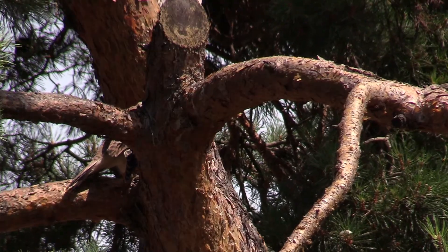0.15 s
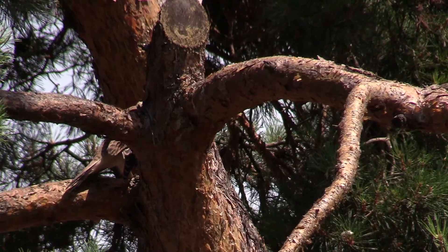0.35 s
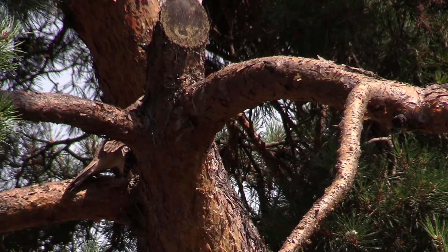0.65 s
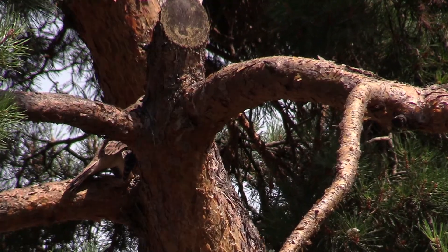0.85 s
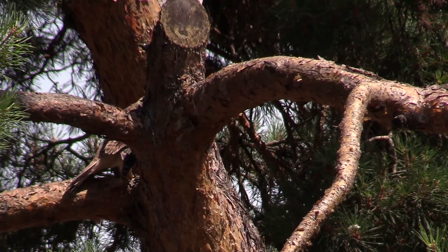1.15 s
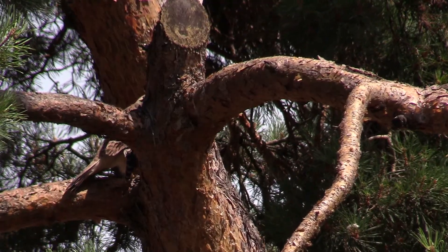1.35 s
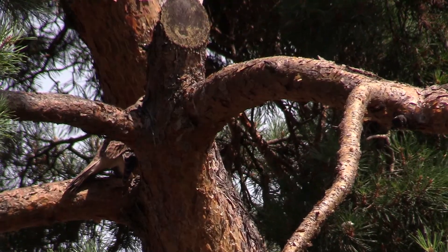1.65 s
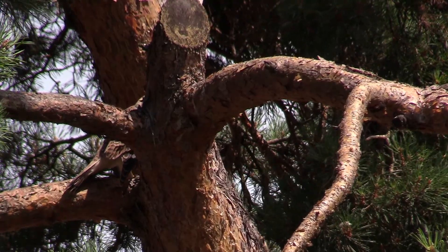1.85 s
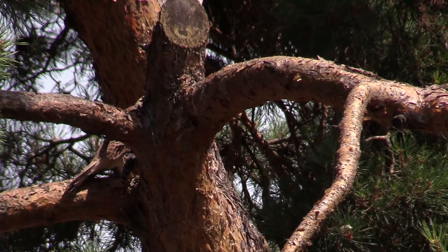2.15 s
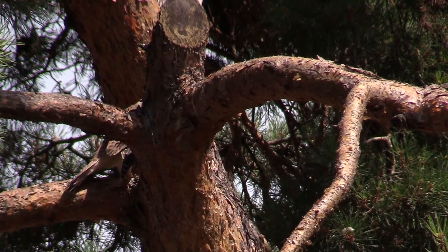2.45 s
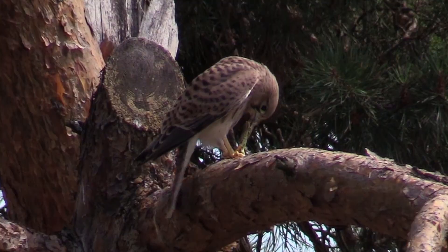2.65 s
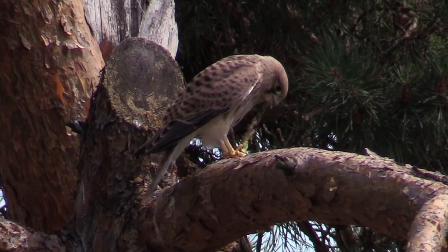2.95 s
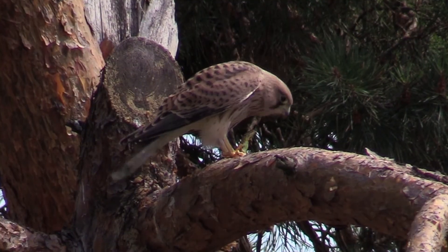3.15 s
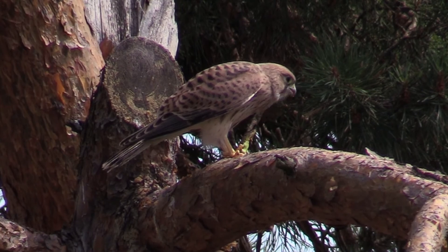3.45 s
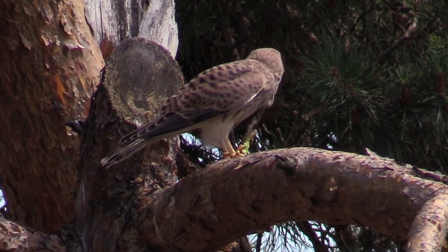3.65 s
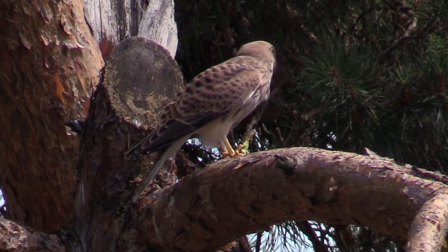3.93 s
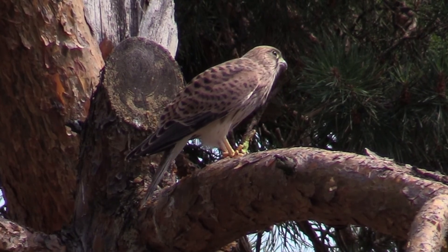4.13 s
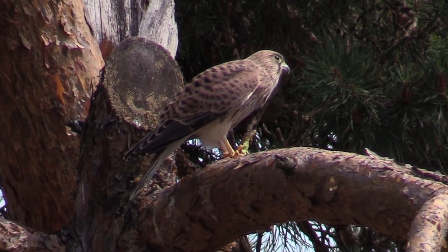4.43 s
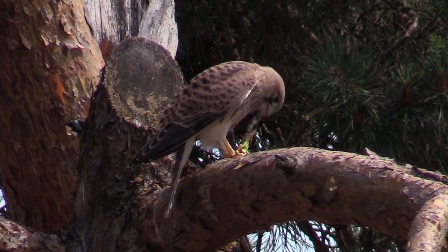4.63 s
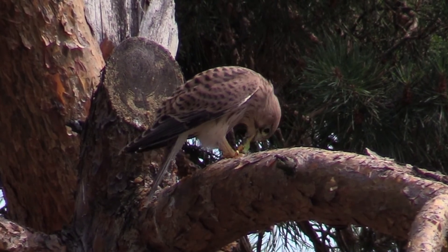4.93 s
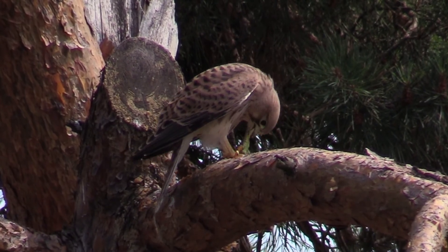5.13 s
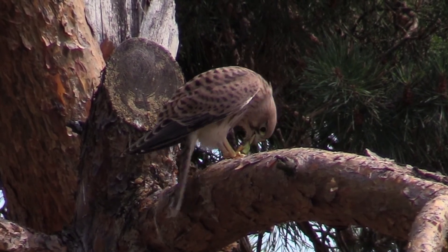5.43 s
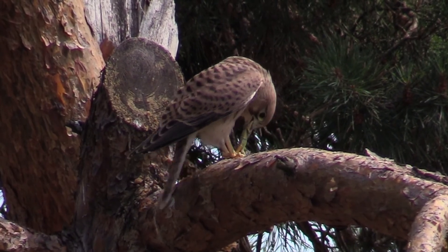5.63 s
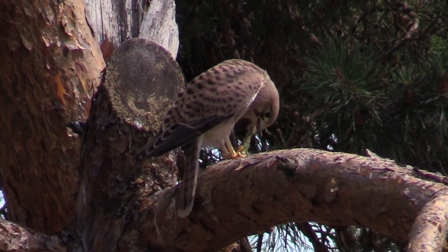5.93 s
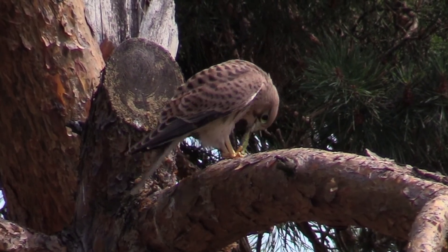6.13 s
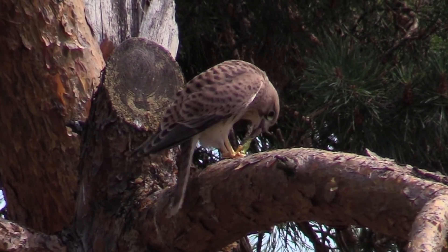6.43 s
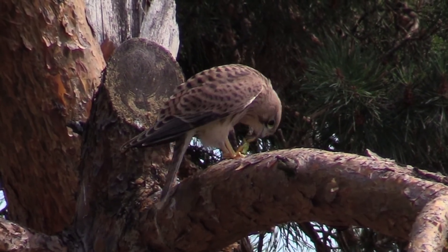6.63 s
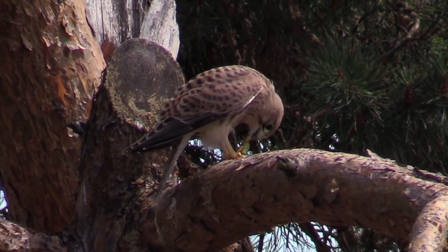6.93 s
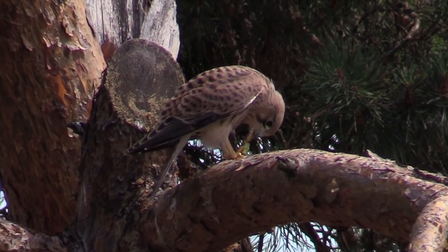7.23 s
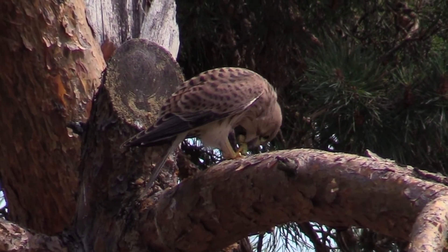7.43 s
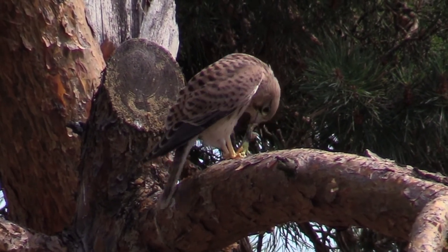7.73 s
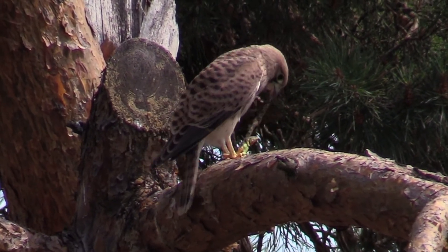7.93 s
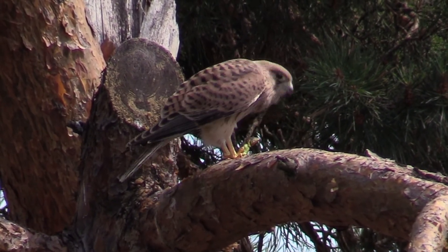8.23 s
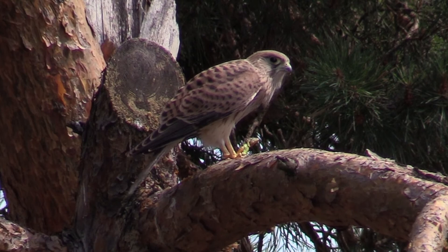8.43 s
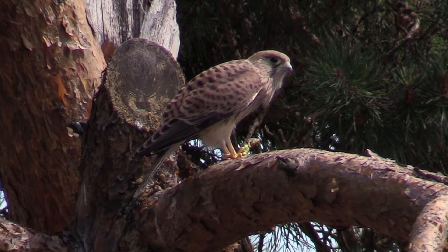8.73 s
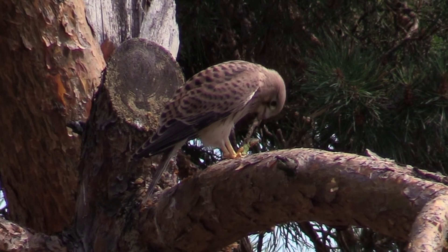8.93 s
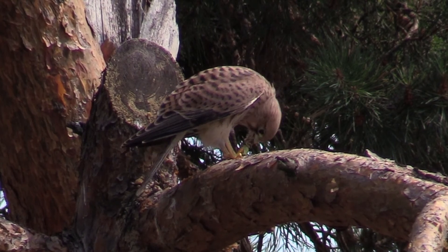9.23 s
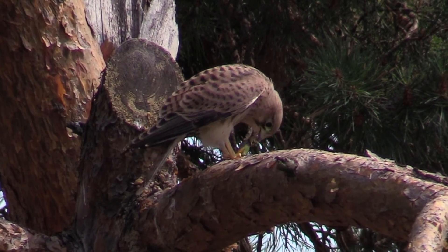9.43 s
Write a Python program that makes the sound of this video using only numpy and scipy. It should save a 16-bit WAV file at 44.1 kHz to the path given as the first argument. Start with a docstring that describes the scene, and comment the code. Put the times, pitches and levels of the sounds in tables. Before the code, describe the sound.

A calm pine wood in wide, natural stereo, with a soft wash of air, barely stirring needles and a deep faint rumble. A harsh double call is already under way at 0 seconds and repeats near 2, 4.2, 6.5 and 8.6, short and raspy, with a scattered woodland echo. A sharp twig tick comes at 0.1. From 0.4 to 2.3 a close wren-like bird sings thin, fast, sliding whistles with a brief burst of dry chips, the high notes leaning left. From 2.6 to 6.4 it is silent, leaving faint distant buzzes, pips and repeated chirps around 4 to 4.6, while small bark ticks cluster around 4.5 to 5.3 under the feeding falcon. The song returns from 6.6 to 9, with slurred far whistles around 7.4 to 8.2, then thins into soft chips and a few last notes by 9.6. A distant low engine swells almost inaudibly at times.

```python
"""A pine wood on a still day, heard by two spaced microphones. A wren-like songbird whistles and chips close by,
its high notes to the left; a larger bird gives a harsh double call about every two seconds, breath and voice.
Small birds whistle and buzz further off; bark and twigs tick, as short noise, under a feeding falcon.
Trunks scatter the birds and ticks, over stirring needles, a soft wash of air and a far engine note."""
import sys
import numpy as np
from scipy import signal
from scipy.fft import rfft, irfft, next_fast_len
from scipy.io import wavfile
from scipy.ndimage import uniform_filter1d

SR = 44100
rng = np.random.default_rng(int(sys.argv[2]) if len(sys.argv) > 2 else 0)


def transcribe(u):
    """Save the signal u as a 16-bit wav file named by the first command-line argument.

    u: samples, shape (n,) or (channels, n), limited to [-1, 1]; the rate is SR.
    q: integer samples, one column per channel.
    """
    v = np.clip(np.atleast_2d(u).T, -1, 1)
    q = np.round(v * 32767).astype(np.int16)
    wavfile.write(sys.argv[1], SR, q)


N = 422478   # length in samples

# near song, note by note: start_s, syllable, length_s, level_db, pitch_shift_percent
SONG_NOTES = [(.436, "sag", 0.13, -35.5, 0.011), (.635, "drop", 0.041, -41.5, .1),
              (0.74, "lift", 0.079, -18.5, .1), (.85, "drop", 0.042, -34.5, 0.36),
              (.94, "flat", 0.05, -28, 0.25), (1.003, "hook", .041, -33.5, 0.21),
              (1.103, "flat", 0.045, -28, 0.37), (1.161, "hook", .041, -32.5, 0.15),
              (1.259, "slide", 0.13, -23.5, -0.02), (1.524, "arch", 0.065, -22, -0.05),
              (1.76, "rise", 0.087, -20.5, -0.13), (1.891, "dive", .051, -20.5, -1.2),
              (1.972, "scoop", 0.089, -22.5, -0.056), (2.108, "dive", 0.049, -20.5, -0.91),
              (2.188, "scoop", 0.093, -25, -0.49), (6.616, "sag", .115, -34, -1.57),
              (6.808, "drop", 0.037, -39, 0.33), (6.911, "lift", 0.086, -19, 0.29),
              (7.018, "drop", 0.039, -32.5, 0.48), (7.113, "flat", 0.055, -29, 0.52),
              (7.172, "hook", 0.045, -32.5, 0.24), (7.286, "slide", 0.12, -22.5, -0.032),
              (7.536, "arch", 0.063, -21.5, 0.39), (7.764, "rise", 0.085, -19, 0.79),
              (7.892, "dive", .049, -20, .1), (7.976, "scoop", 0.083, -20.5, 1.2),
              (8.113, "dive", 0.041, -20, 1), (8.191, "scoop", .089, -23.5, 0.025),
              (8.323, "dive", 0.055, -22.5, -0.12), (8.406, "scoop", .088, -23.5, -0.13),
              (8.544, "dive", 0.052, -23, 1), (8.818, "hold", .16, -27.5, 0.18),
              (9.295, "peak", 0.063, -30.5, -0.032), (9.422, "flick", .07, -32.5, 0.02),
              (9.536, "whip", .036, -35.5, 0.27)]
# its syllable shapes by name: place in the note (0-1), pitch_hz, level_db against the note
SYLLABLE_SHAPES = { "sag": [(0, 7500, -7), (.2, 6660, -5.5), (.5, 6320, -4.5), (.8, 6130, 1.5),
                   (1, 6100, -19)], "drop": [(0, 5050, -8), (.25, 4960, -3), (.7, 4020, -3.5),
                   (.92, 3610, -15), (1, 3620, -25)], "lift": [(0, 5600, -24), (.25, 5900, -9.5),
                   (.5, 6013, 0), (.8, 6520, -16), (1, 6540, -28)], "flat": [(0, 5180, -20),
                   (.25, 5080, -11), (.55, 5140, -2), (.75, 5120, -6), (1, 5300, -16)],
                   "hook": [(0, 5300, -19), (.2, 5400, -6.5), (.45, 4950, 1.5), (.72, 4270, -2.5),
                   (.93, 3956, -14), (1, 3800, -26.5)], "slide": [(0, 9050, -26), (.06, 8900, -18.5),
                   (.22, 8200, -2.5), (.45, 7600, -3.5), (.88, 7010, 1.5), (1, 7100, -16)],
                   "arch": [(0, 5840, -12), (.19, 6880, -7), (.29, 6990, 0), (.8, 5520, -2),
                   (1, 5080, -28)], "rise": [(0, 6700, -22), (.08, 6610, -2), (.42, 6730, 0.5),
                   (.87, 7590, -12), (.97, 8050, -13), (1, 7950, -29)], "scoop": [(0, 6000, -1),
                   (.15, 6410, -5), (.58, 6720, 0), (.87, 7650, -10.5), (.97, 8030, -13), (1, 8140, -28)],
                   "dive": [(0, 6250, -25), (.24, 6300, -1), (.77, 4814, -11), (.94, 4300, -19.5),
                   (1, 4200, -28)], "hold": [(0, 7050, -28), (.12, 6900, 1.5), (.25, 6480, -0.5),
                   (.77, 6420, -1.5), (1, 6430, -20)], "peak": [(0, 8000, -18), (.16, 8240, -4),
                   (.38, 8250, -2), (.72, 7120, 0), (1, 6900, -5)], "whip": [(0, 4200, -15), (.4, 4800, -1),
                   (.7, 5900, -3.5), (1, 6200, -22)], "flick": [(0, 4430, -23), (.3, 4360, -8),
                   (.55, 4700, -1.5), (.82, 5890, -2), (1, 6180, -20)], }
# runs of dry falling chips in soft-loud pairs: first_s, last_s, pair_spacing_s, base_level_db
CHIP_RUNS = [(1.626, 1.723, .066, -42.5), (7.636, 7.73, .064, -43.5), (9, 9.245, .0702, -47)]
# how the song leans with pitch: pitch_hz, left_over_right_db
SONG_LEAN = [(4400, -2.5), (5200, -6.5), (5600, -5), (6200, 11), (6800, 10), (7600, 7), (8600, 11)]
# harsh double calls, the first already under way: start_s, level_db, gap_to_second_bark_s, second_length_s
DOUBLE_CALLS = [(-.06, -41.5, 0.1, 0.047), (2.02, -41, 0.11, 0.045), (4.207, -42, 0.12, 0.063),
                (6.493, -41.5, .11, 0.046), (8.579, -41.5, 0.099, 0.051)]
# throat resonances that colour the breath: centre_hz, width_hz of one filter pass, level_db
THROAT_BANDS = [(1114, 310, -5), (1630, 154, -7), (1906, 260, -8.5), (2636, 330, -10.5), (3752, 256, 3.5),
                (4800, 430, -5), (5350, 650, -6.5), (6330, 660, -15), (7430, 260, -18), (5500, 2300, -13.5),
                (1940, 2200, -19)]
# farther birds: start_s, kind, length_s, middle_hz, level_db, left_over_right_db
FAR_NOTES = [(.209, "high buzz", 0.085, 8620, -40, 3), (.261, "rasp", 0.028, 6330, -51, -1),
             (0.342, "rasp", 0.027, 6550, -46.5, 2), (0.345, "high buzz", 0.0795, 8680, -43, 5),
             (0.39, "up", 0.025, 6250, -50, 3), (0.748, "level", 0.059, 8120, -45.5, -3),
             (1.44, "down", 0.032, 3120, -51, -3), (2.618, "buzz", .13, 7600, -55, 16),
             (2.851, "buzz", 0.16, 7600, -53, 10), (2.997, "pip", 0.022, 2140, -48, 0),
             (2.996, "pip", .025, 2710, -54, -2), (3.146, "pip", 0.022, 1700, -54, 0),
             (3.183, "level", .087, 6280, -60, -6), (3.23, "up", .03, 1830, -55, 2),
             (3.382, "level", 0.067, 6300, -57, 1), (3.465, "slur", .07, 5500, -58, -4),
             (3.575, "level", .048, 3900, -63, -7), (3.491, "droop", .019, 2440, -55, 0),
             (3.682, "buzz", .14, 7200, -49, 6), (3.817, "droop", 0.25, 7200, -57.5, 6),
             (3.998, "chirp", .069, 4570, -51.5, -10), (4.18, "chirp", 0.079, 4520, -52, -9),
             (4.372, "chirp", 0.072, 4620, -55, -7), (4.542, "chirp", 0.077, 4470, -53, -11),
             (4.73, "droop", 0.07, 7900, -58, 6), (4.896, "down", .026, 4680, -53, -6),
             (4.982, "up", .1, 7130, -54, 8), (5.044, "droop", 0.092, 6430, -55, -2),
             (5.452, "buzz", .1, 6570, -56, -3), (5.781, "pip", 0.019, 2075, -48.5, 2),
             (5.793, "down", 0.02, 4450, -56, -4), (6.388, "level", .12, 7230, -59, 7),
             (6.573, "up", 0.025, 6230, -48, 3), (7.373, "slur", .11, 4540, -47, -2),
             (7.462, "down", .033, 3000, -57, -5), (7.557, "up", 0.087, 3650, -49, -4),
             (7.715, "slur", .097, 4500, -48, -5), (7.902, "up", 0.092, 3630, -48.5, -3),
             (8.09, "slur", 0.1, 4500, -47, -6), (8.383, "level", .04, 6810, -45.5, 12),
             (9.287, "droop", 0.011, 7350, -50, 5)]
# far kinds by name: start_percent and end_percent above middle pitch, buzz_depth_hz, swell_db start to end
FAR_SHAPES = {"buzz": (-5, 0, 338, -1), "high buzz": (-4.5, -.5, 120, -4), "rasp": (-6.5, 10, 690, .1),
              "level": (-1.5, .1, 40, -1), "up": (-6, 6, 0, 7), "chirp": (-13, 18, 0, 7),
              "slur": (16, -5, 0, 3), "down": (14.7, -14, 0, -5), "droop": (3, -4.5, 70, -4),
              "pip": (.1, -.5, 0, .1)}
# ticks of bark and twigs: start_s, bright_band_peak_db, left_over_right_db, low_band_db against the bright band
TWIG_TICKS = [(.1101, -46, 2, -4), (.1271, -29.5, -2, -11), (0.7154, -42.5, 4, 10), (1.1096, -45, .5, -4),
              (1.513, -43, 2.5, 5), (2.0622, -47, 5, -4), (3.0597, -36, 5, -10), (3.1592, -45, 9, -5),
              (4.5145, -39, 5, 6), (4.8289, -48, 2, -8), (4.882, -36.5, 6, -17), (4.9985, -44, .5, -8),
              (5.0449, -42, 1.5, -4), (5.1467, -45, 3, -6), (5.2505, -40.5, -1, -5), (5.3253, -41, -1, -8),
              (6.1477, -37.5, 9, -22), (6.6667, -46, 14, -4), (7.8461, -44, 8, -4), (7.9049, -39, 6, -12),
              (7.9428, -45, 11, 2), (8.6605, -42, -2, 0), (8.6971, -40, -3, -2), (8.735, -43, -3.5, -4),
              (9.1112, -44, 4, 12)]
# swells of the far engine note: start_s, end_s, level_db
ENGINE_SWELLS = [(2.95, 3.78, -66.5), (5.15, 5.3, -73), (7.85, 8.98, -68.5), (9.35, 9.7, -67)]
# colour of the air, relative only: frequency_hz, density_db per Hz
AIR_COLOUR = [(8, 2.5), (20, 1.5), (28, -8), (38, -16.5), (60, -27), (240, -26), (450, -17), (850, -22.5),
              (1400, -21.5), (2600, -27.5), (4400, -29), (6500, -26.5), (9000, -34.5), (16000, -50)]
# how the air leans: frequency_hz, left_over_right_db
AIR_LEAN = [(100, -1), (400, 1), (900, 6), (2400, 1), (4400, -2), (8000, 4), (15000, -2.5)]

# near song: the chip scales stretch a shape set in song()
CHIP_HZ, CHIP_FALL_SCALE_HZ, CHIP_TIME_SCALE_S = 6820, 3000, 0.0086
LOUD_CHIP_PLACE, SOFT_CHIP_DB, OPENING_DB = .45, -4, -4   # place is a share of the pair spacing
# harsh call: a bark's pair of pitches is its start and end
FIRST_BARK_S, FIRST_BARK_HZ, SECOND_BARK_HZ = 0.0441, (1172, 871), (1024, 964)
RASP_HZ = 140   # mean rate
VOICE_DB, OCTAVE_DB = 7, -13.5   # voice against the push of breath; octave against the voice
# far birds
BUZZ_HZ = 168.7   # mean rate
BUZZ_TOP_DB_PER_KHZ = 5.5   # louder at the top of the swing, by depth
# ticks
TICK_BODY_DB = 9.5   # middle band against the bright band
# background
RUSTLE_DB = -65.5   # before the band filter and the stirring
ENGINE_HZ, ENGINE_IDLE_DB, ENGINE_FADE_DB_PER_S = 69, -85, 75
AIR_DB = -46.5   # mean level setting
# space and microphones
SONG_LAG, CALL_LAG, FAR_LAG = -82, 18, 34   # samples by which the left microphone is late
WOOD_T60_S, FAR_T60_S = 0.28, .5
SCATTER_HZ, CUTOFF_HZ = 2430, 15900
LEFT_RIGHT = np.array([[1], [-1]])


def amp(db):
    """Gain of a level in dB."""
    return 10 ** (np.asarray(db) / 20)


def at_hz(points, hz):
    """A table read on a log-frequency axis."""
    table = np.array(points)
    return np.interp(np.log(hz), np.log(table[:, 0]), table[:, 1])


def smooth(x, hz):
    """Double one-pole low-pass."""
    r = np.exp(-2 * np.pi * hz / SR)
    return signal.lfilter([(1 - r) ** 2], [1, -2 * r, r * r], x)


def wobble(hz, size=N):
    """Random drift of spread 1; a higher hz makes it quicker."""
    x = smooth(rng.standard_normal(size + 4000), hz)[4000:]   # skip the filter's start
    return x / x.std()


def add(out, sound, s):
    """Mixes a sound in at time s, trimmed to fit."""
    i = round(s * SR)
    part = sound[..., max(-i, 0):out.shape[-1] - i]
    first = max(i, 0)
    out[..., first:first + part.shape[-1]] += part


def whistle(hz, gain):
    """A sine that follows a pitch track, from a random phase."""
    cycles = np.cumsum(hz) / SR + rng.random()
    return gain * np.sin(2 * np.pi * cycles)


def heard(pair, lag, echo_db, early_db, t60=WOOD_T60_S):
    """Direct sound with a delay between the microphones, early echoes and a scattered tail from the trunks."""
    t = np.arange(SR // 2) / SR
    tail = rng.standard_normal((2, len(t))) * amp(-60 * t / t60) * np.clip(t / 0.011, 0, 1)
    tail = signal.lfilter(*signal.butter(1, SCATTER_HZ, "high", fs=SR), tail)   # trunks scatter short waves best
    tail *= amp(echo_db) / np.sqrt(np.sum(tail ** 2, axis=1, keepdims=True))
    path = np.zeros((2, 1000))
    for side, late in enumerate((max(lag, 0), max(-lag, 0))):
        path[side, late] = 1
        # ground and near branches
        path[side, late + rng.integers(60, 500, 4)] += amp(early_db) * rng.choice([-1, 1], 4)
    direct = signal.fftconvolve(pair, path, axes=1)[:, :N]
    middle = pair.mean(axis=0, keepdims=True)   # both tails are fed alike
    return direct + signal.fftconvolve(middle, tail, axes=1)[:, :N]


def song():
    """Pure whistles with rounded pitch turns and short chips; high notes reach the left side better."""
    out = np.zeros((2, N))
    shapes = {name: np.transpose(rows) for name, rows in SYLLABLE_SHAPES.items()}
    notes = []
    for s, name, length, db, shift in SONG_NOTES:
        place, hz, shape_db = shapes[name]
        notes.append((s + length * place, hz * (1 + shift / 100), db + shape_db))
    chip_s = CHIP_TIME_SCALE_S * np.array([-0.83, -0.14, .2, 0.82])
    chip_hz = CHIP_HZ - CHIP_FALL_SCALE_HZ * np.array([-0.335, -0.22, 0.29, 0.93])
    chip_db = np.array([-33, 3.5, 12.5, -10])
    notes += [(s + chip_s, chip_hz, db + chip_db) for s, db in chips()]
    for s, hz, db in notes:
        t = np.arange(s[0], s[-1], 1 / SR)
        turn = len(t) // 12 + 1   # rounds the corners
        pitch = uniform_filter1d(np.interp(t, s, hz), turn, mode="nearest")
        level = uniform_filter1d(np.interp(t, s, db), turn, mode="nearest")
        left = whistle(pitch, amp(level)) * signal.windows.tukey(len(t), .1)
        right = left * amp(-at_hz(SONG_LEAN, pitch))
        add(out, np.array([left, right]), s[0])
    return heard(out, SONG_LAG, echo_db=-8.5, early_db=-9)


def chips():
    """Times and base levels of the chips: soft-loud pairs, each run opening more softly."""
    rows = []
    for first, last, pace, db in CHIP_RUNS:
        for k, s in enumerate(np.arange(first, last - pace / 4, pace)):
            rows.append((s, db + SOFT_CHIP_DB + OPENING_DB * (k == 0)))
            rows.append((s + LOUD_CHIP_PLACE * pace, db))
    return rows


def harsh_call():
    """A falling voiced note plus breath chopped by an uneven rasp in throat resonances; barks start hard and fade."""
    lead = SR // 10   # room for the call that begins before the start
    size = N + lead
    rasp = np.sin(2 * np.pi * np.cumsum(RASP_HZ * (1 + .3 * wobble(19.7, size=size))) / SR)
    effort, voice = np.zeros(size), np.zeros(size)
    t = np.arange(SR // 4) / SR
    for s, db, length, start_hz, end_hz in barks():
        push_db = db - 108 * t - 840 * np.maximum(t - length, 0)   # drops fast past its length
        push = amp(push_db) * np.clip(t / 0.0048, 0, 1)
        pitch = np.interp(t, [0, length], [start_hz, end_hz]) + 25 * wobble(105, size=len(t))
        note = whistle(pitch, 1.0) + whistle(2 * pitch, amp(OCTAVE_DB))
        add(effort, push, s + lead / SR)
        waver_db = 2.5 * wobble(70, size=len(t))
        add(voice, note * push * amp(VOICE_DB - 136 * t + waver_db), s + lead / SR)
    breath = effort * rng.standard_normal(size) * amp(2.5 * rasp)
    breath = breath + 1e-18   # keeps the filters off vanishing numbers
    out = voice
    for hz, width_hz, db in THROAT_BANDS:
        r = np.exp(-np.pi * width_hz / SR)
        b = [(1 - r * r) / 2, 0, (r * r - 1) / 2]
        a = [1, -2 * r * np.cos(2 * np.pi * hz / SR), r * r]
        band = signal.lfilter(b, a, signal.lfilter(b, a, breath))   # twice, for dark valleys
        out = out + amp(db) * np.sqrt(2 * SR / np.pi / width_hz) * band   # evens out the widths
    wet = heard(np.array([out[:N], out[:N]]), CALL_LAG, echo_db=1.0, early_db=-9.0, t60=FAR_T60_S)
    return np.concatenate([wet[:, lead:], np.zeros((2, lead))], axis=1)


def barks():
    """Each call is a steeply falling bark and a flatter one."""
    rows = []
    for s, db, gap, length in DOUBLE_CALLS:
        rows.append((s, db, FIRST_BARK_S, *FIRST_BARK_HZ))
        rows.append((s + gap, db, length, *SECOND_BARK_HZ))
    return rows


def far_birds():
    """Curved whistles; a fast uneven vibrato turns some into buzzes."""
    out = np.zeros((2, N))
    for s, kind, length, middle_hz, db, balance_db in FAR_NOTES:
        start, end, depth_hz, swell_db = FAR_SHAPES[kind]
        u = np.linspace(0, 1, round(length * SR))
        curve = np.polyfit([0, .5, 1], [start, 0, end], 2)
        pitch = middle_hz * (1 + np.polyval(curve, u) / 100)
        buzz_rate = BUZZ_HZ * (1 + 0.285 * wobble(54.0, size=len(u)))
        buzz = np.sin(2 * np.pi * np.cumsum(buzz_rate) / SR)
        flutter_db = (0.44 + depth_hz / 150) * wobble(33, size=len(u))   # buzzes also throb more
        throb_db = BUZZ_TOP_DB_PER_KHZ * depth_hz / 1000 * buzz
        level = db + swell_db * (u - .5) + flutter_db + throb_db
        note = whistle(pitch + depth_hz * buzz, amp(level)) * signal.windows.tukey(len(u), .35)
        add(out, note * amp(balance_db / 2 * LEFT_RIGHT), s)
    return heard(out, FAR_LAG, echo_db=-3, early_db=-17)


def ticks():
    """Each tick is a few milliseconds of fading noise in three bands; fainter ones fall at random."""
    rows = [(s, db, balance_db, TICK_BODY_DB, low_db) for s, db, balance_db, low_db in TWIG_TICKS]
    rows += [(u * N / SR, -57 + 6 * v, 8 * w - 2.5, 3, -10) for u, v, w in rng.random((60, 3))]
    out = np.zeros((2, N))
    fade = amp(-60 * np.arange(400) / SR / 0.0039)
    edges = [9000, 16000], [4700, 9500], [900, 5000]   # bright, body, low (Hz)
    bands = [signal.butter(2, edges_hz, "band", fs=SR, output="sos") for edges_hz in edges]
    snaps = rng.standard_normal((len(rows), 3, 400)) * fade
    for (s, db, balance_db, body_db, low_db), snap in zip(rows, snaps):
        parts = np.array([signal.sosfilt(band, noise) for band, noise in zip(bands, snap)])
        tick = (amp([0, body_db, low_db]) / np.abs(parts).max(axis=1)) @ parts
        add(out, tick * amp(db + balance_db / 2 * LEFT_RIGHT), s)
    return heard(out, SONG_LAG, echo_db=-17, early_db=-22)


def rustle():
    """Needles stir in short patches: bright noise that swells and crackles unevenly."""
    sos = signal.butter(2, [5000, 14000], "band", fs=SR, output="sos")
    stir_db = 5 * wobble(3.8) + 3 * wobble(40)
    return amp(RUSTLE_DB + stir_db) * signal.sosfilt(sos, rng.standard_normal((2, N)))


def engine_note():
    """A far engine as a low wavering sine that swells now and then, alike on both sides."""
    t = np.arange(N) / SR
    swells = []
    for start, end, db in ENGINE_SWELLS:
        outside_s = np.maximum(np.maximum(start - t, t - end), 0)
        swells.append(db - ENGINE_FADE_DB_PER_S * outside_s)
    level = np.maximum(np.max(swells, axis=0), ENGINE_IDLE_DB)
    return whistle(ENGINE_HZ + 2.85 * wobble(4.7), amp(level))


def air():
    """Diffuse wash of needles and distance over a deep wind rumble: shaped noise, unrelated at the two microphones."""
    size = next_fast_len(N)
    hz = np.maximum(np.fft.rfftfreq(size, 1 / SR), 1)
    shape = amp(at_hz(AIR_COLOUR, hz) + at_hz(AIR_LEAN, hz) / 2 * LEFT_RIGHT)
    wash = irfft(rfft(rng.standard_normal((2, size))) * shape, size)[:, :N]
    return amp(AIR_DB + 0.84 * wobble(1.9)) * wash / wash.std()


def scene():
    """All sources at the two microphones."""
    return song() + harsh_call() + far_birds() + ticks() + rustle() + engine_note() + air()


def record(dry):
    """A steep low-pass cuts the top."""
    return signal.sosfilt(signal.cheby2(14, 60, CUTOFF_HZ * 1.03, fs=SR, output="sos"), dry)


dry = scene()
out = record(dry)
transcribe(out)
```